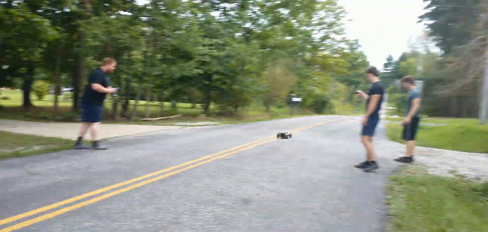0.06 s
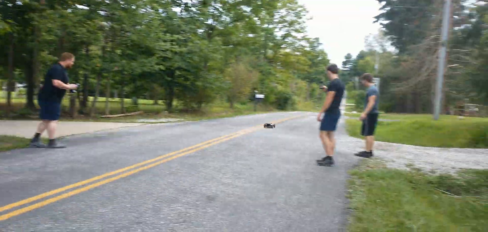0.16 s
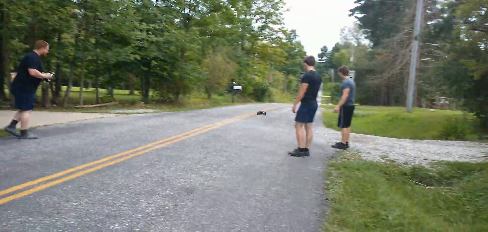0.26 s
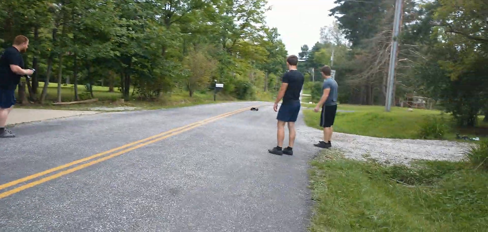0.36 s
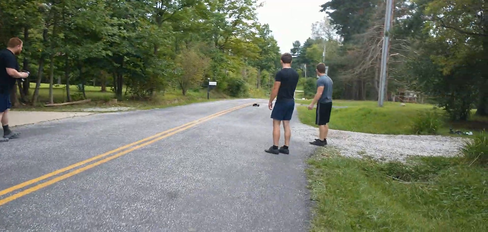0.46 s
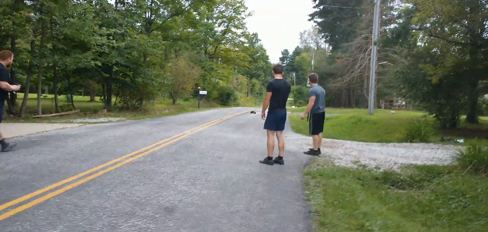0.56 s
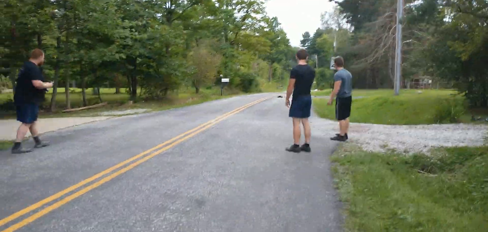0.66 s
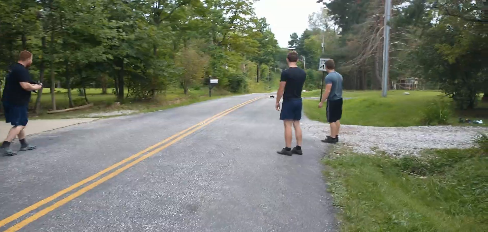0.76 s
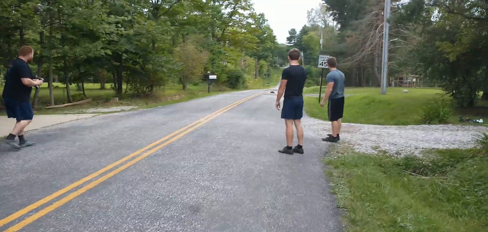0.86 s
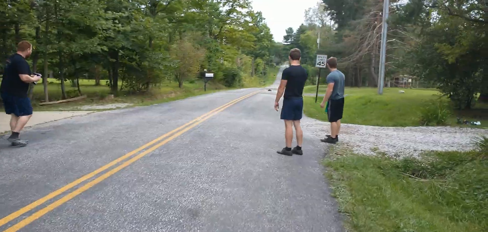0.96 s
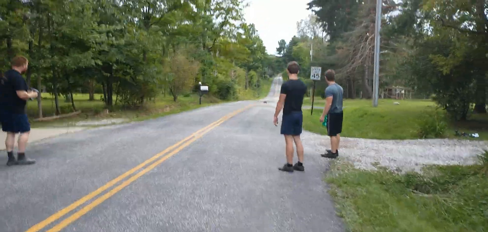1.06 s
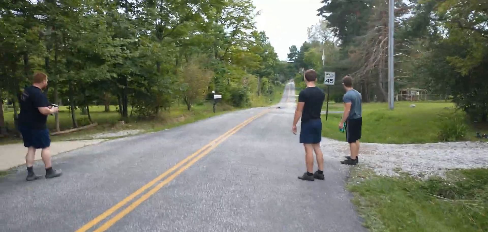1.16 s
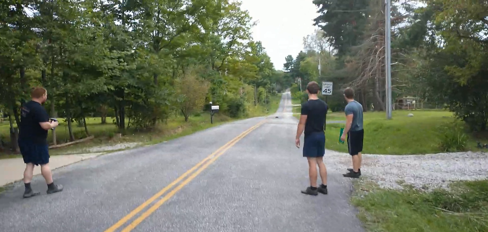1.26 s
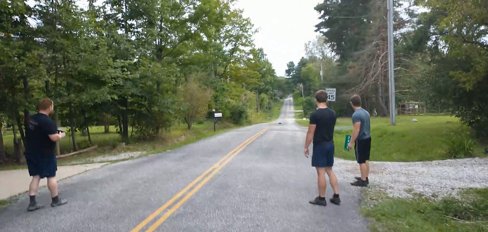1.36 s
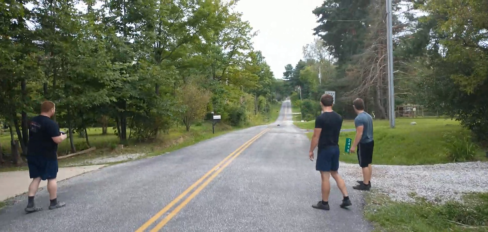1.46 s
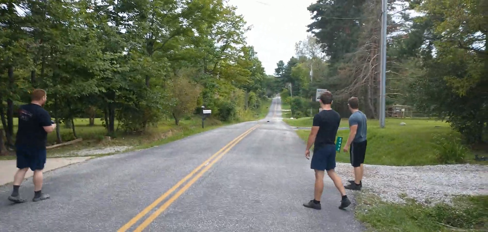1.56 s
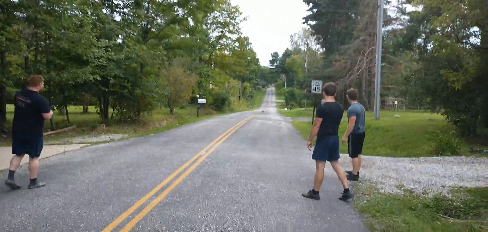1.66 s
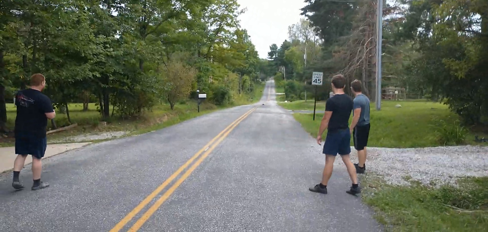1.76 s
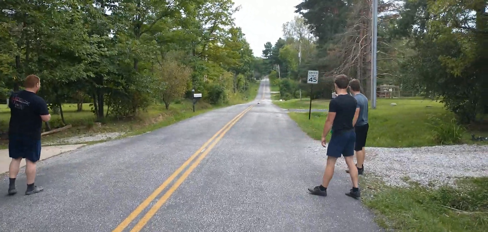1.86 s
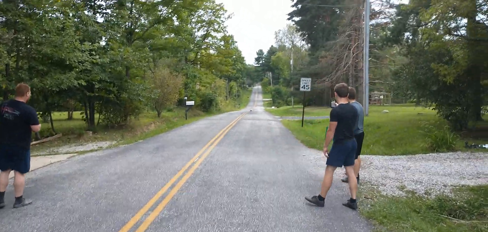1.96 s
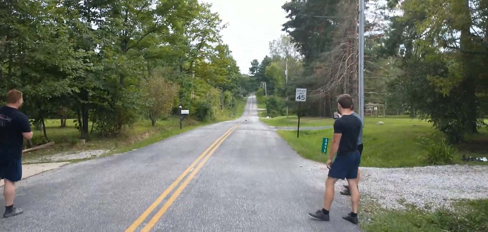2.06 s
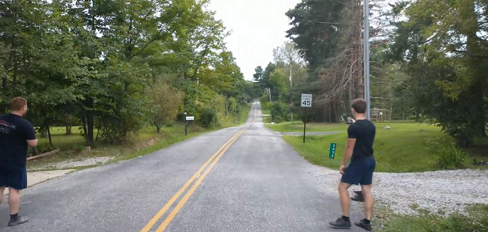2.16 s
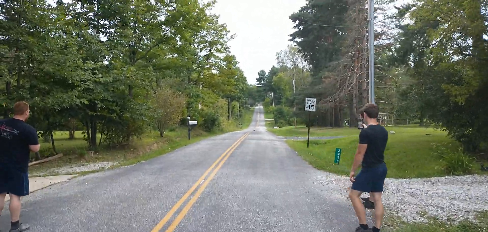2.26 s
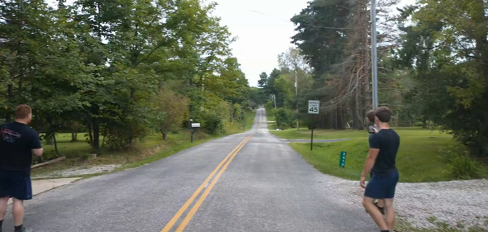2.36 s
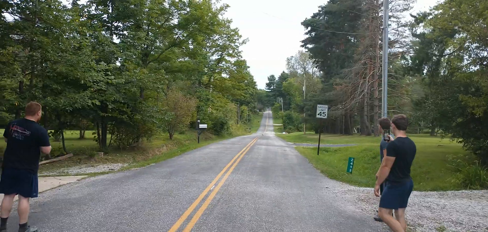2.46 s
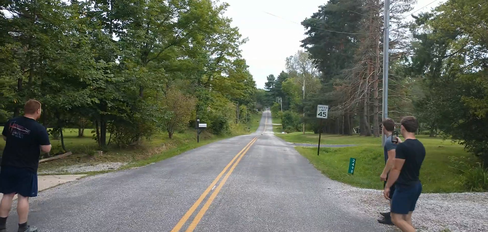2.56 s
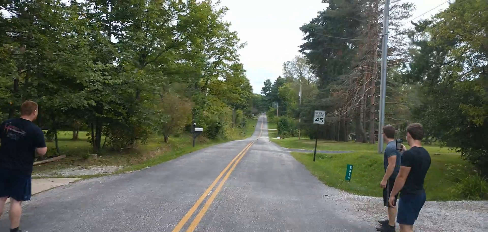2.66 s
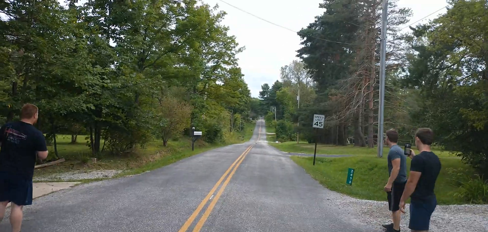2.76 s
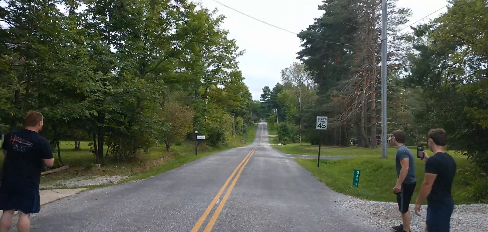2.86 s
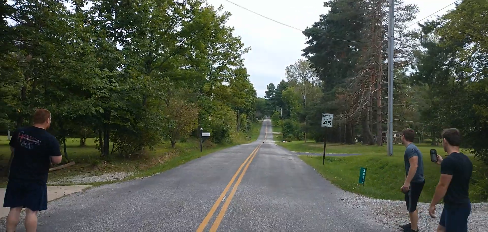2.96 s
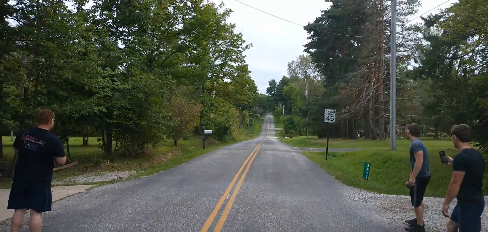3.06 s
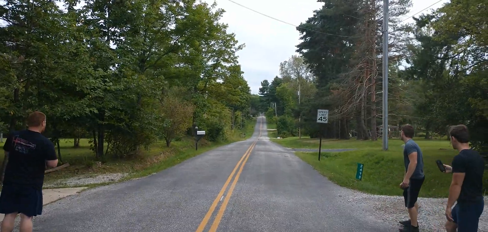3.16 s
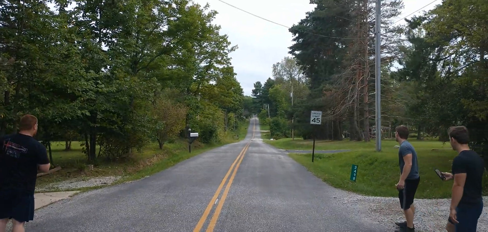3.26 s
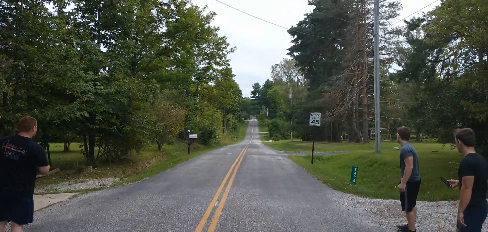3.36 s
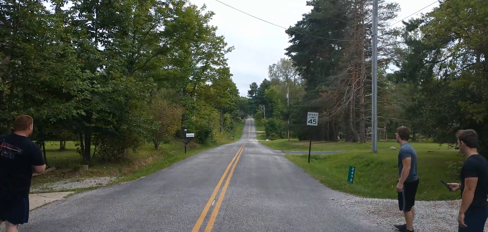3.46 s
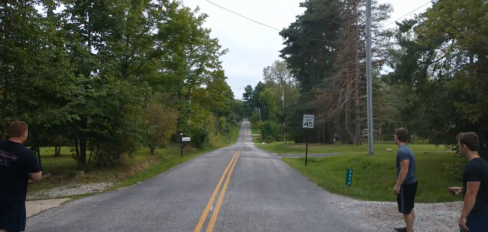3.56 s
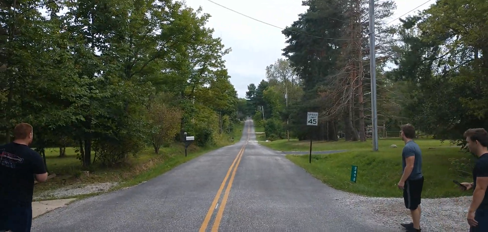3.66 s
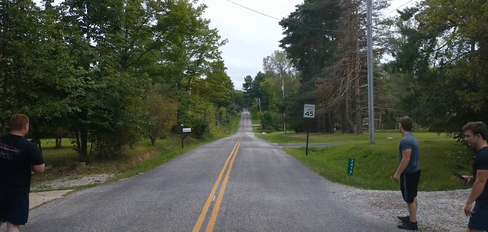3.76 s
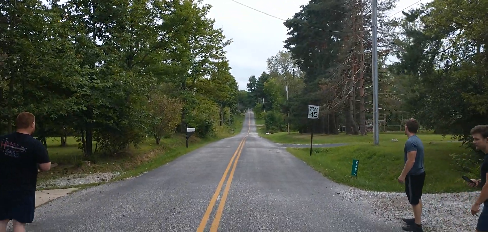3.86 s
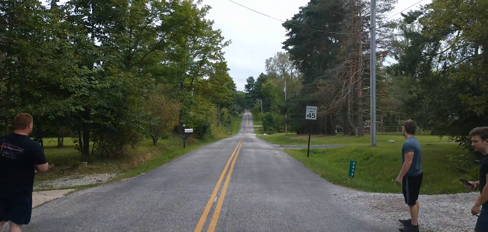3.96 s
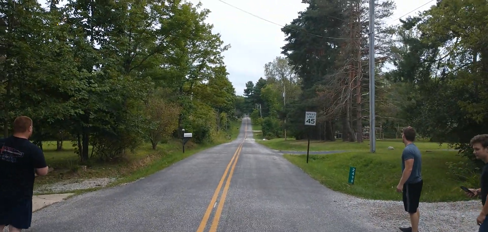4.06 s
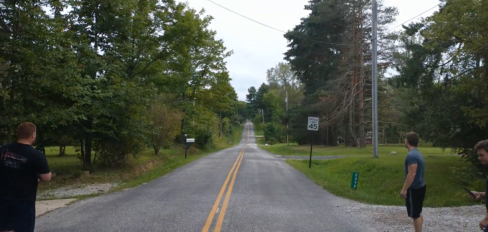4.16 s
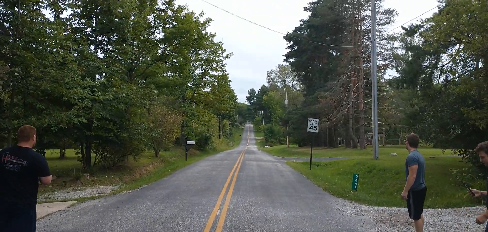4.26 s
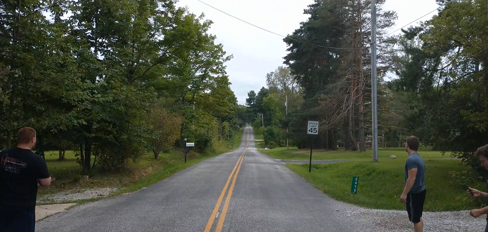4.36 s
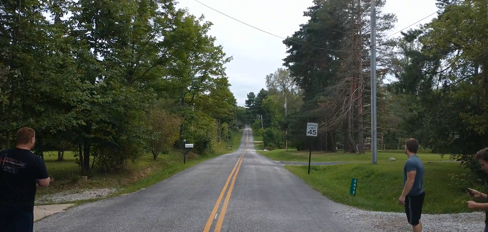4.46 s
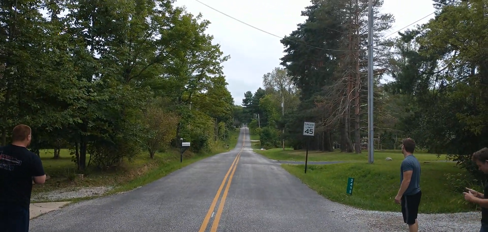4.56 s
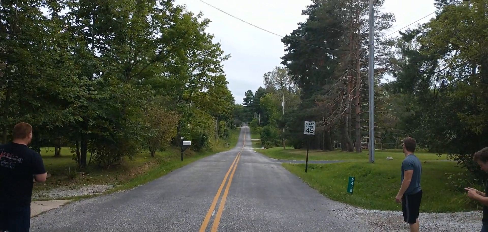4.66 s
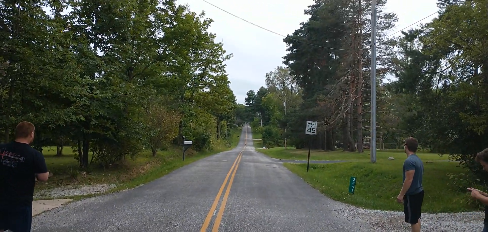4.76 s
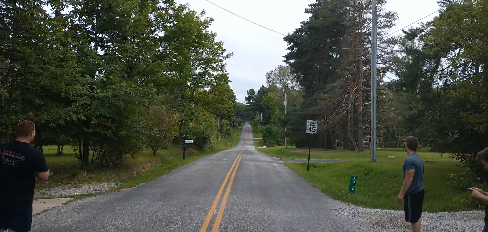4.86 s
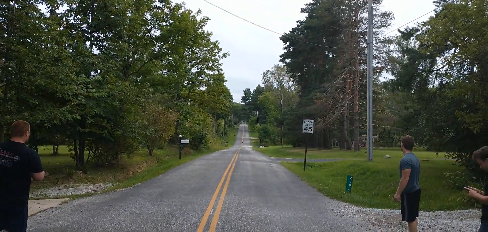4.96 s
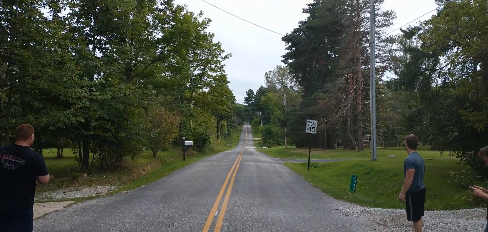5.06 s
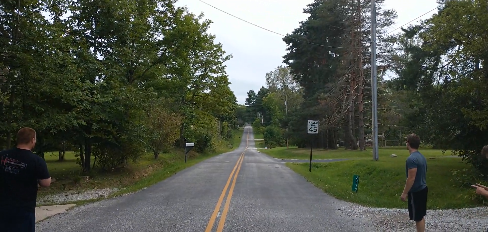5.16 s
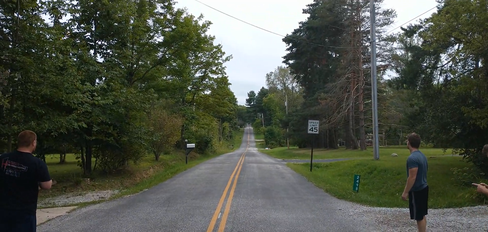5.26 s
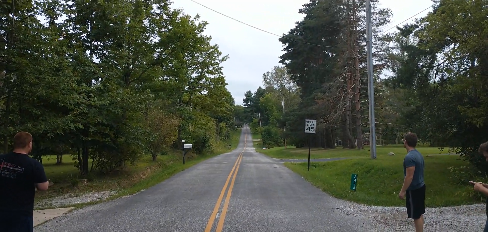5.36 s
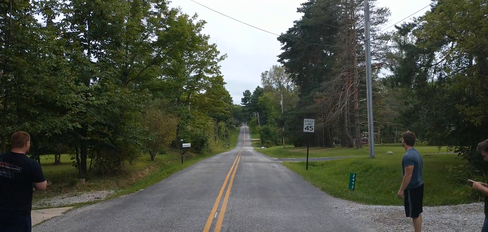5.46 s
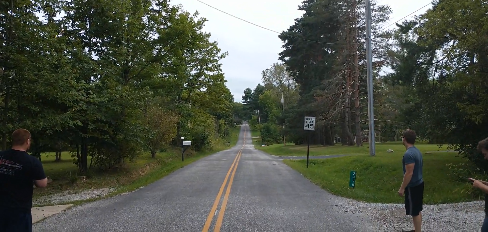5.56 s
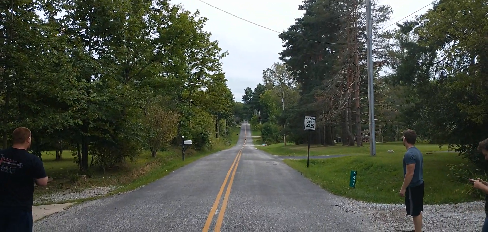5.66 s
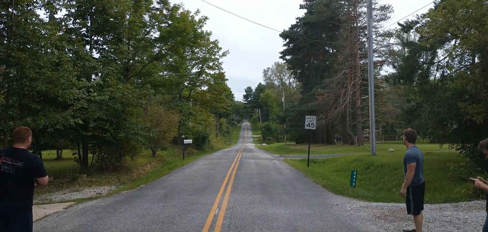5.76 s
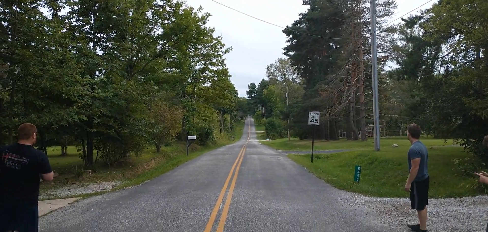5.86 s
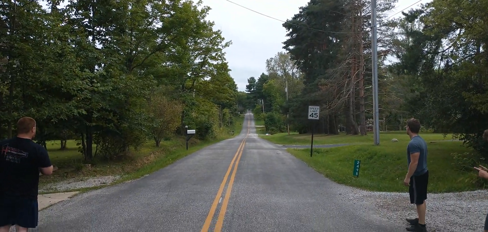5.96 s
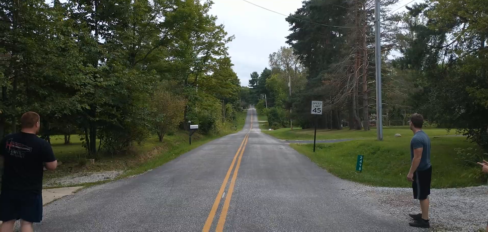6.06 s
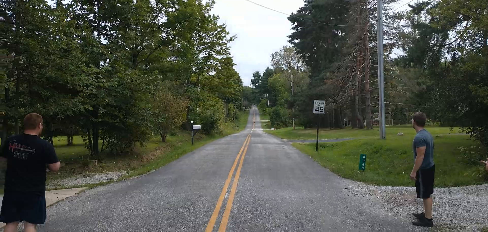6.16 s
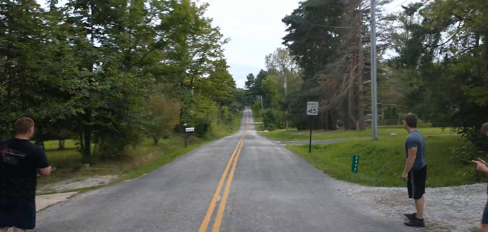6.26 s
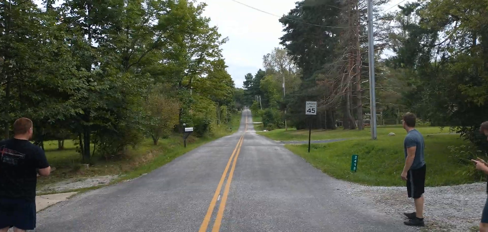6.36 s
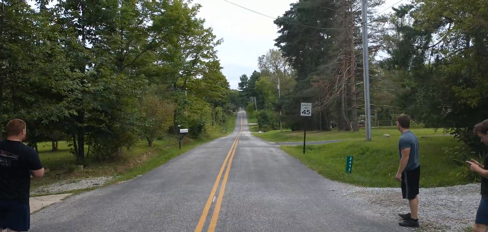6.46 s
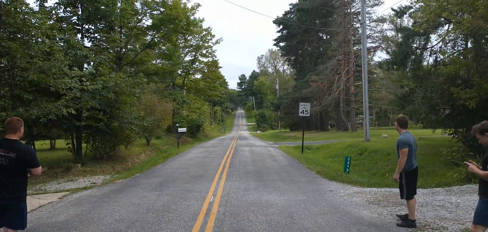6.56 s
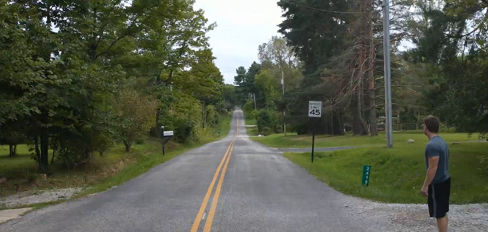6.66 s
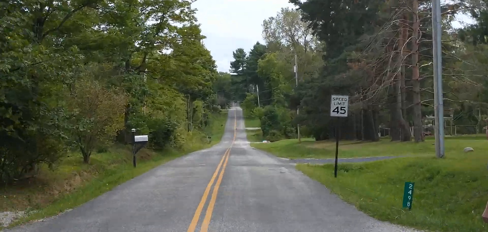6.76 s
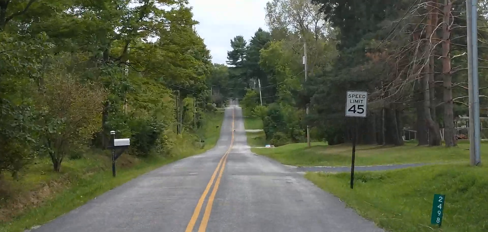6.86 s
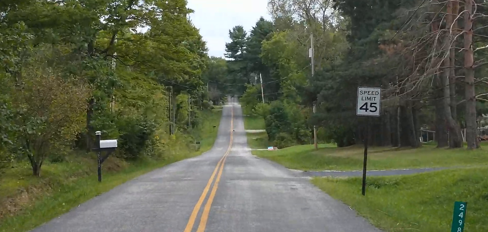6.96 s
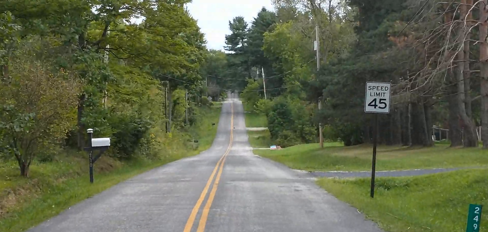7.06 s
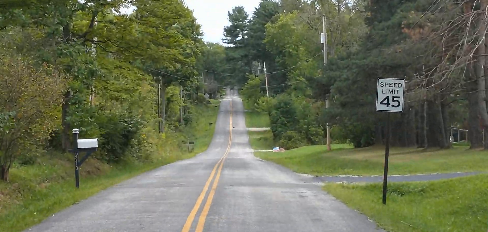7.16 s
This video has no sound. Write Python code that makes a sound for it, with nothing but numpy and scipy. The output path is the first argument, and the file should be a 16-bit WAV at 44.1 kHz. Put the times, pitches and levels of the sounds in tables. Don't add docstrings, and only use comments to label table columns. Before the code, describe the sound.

Open country road, stereo handheld microphone, dry and natural. At 0 s a fast electric model buggy is loud and close: a piercing gear whine near 2.9 kHz, higher harmonics and a rough, hissy tyre roar. It races away, dropping steeply in level within the first second while the pitch stays nearly constant, rising very slightly. Shoes crunch sharply on grit with small thuds around 0.85-1.15 s; duller knocks follow near 1.7 and 2.8 s. The distant roar flutters, brightens around 2 s, then its top hiss falls away at 2.3 s behind a crest. At 3.85 s power cuts, with a small scuff and bumps nearby; the whine almost vanishes. A faint, wavering whine re-emerges from about 4.7 s, gliding down to roughly 1.2 kHz by 7 s as it dies. Soft insects, leaves and low rumble continue underneath. A tiny plastic tick clicks at the right at 6.36 s.

```python
import sys
import numpy as np
from scipy import signal
from scipy.io import wavfile
from scipy.ndimage import uniform_filter1d

SR = 44100
rng = np.random.default_rng(int(sys.argv[2]) if len(sys.argv) > 2 else 0)


def int16_out(signal):
    q = np.round(np.clip(np.atleast_2d(signal).T, -1, 1) * 32767)
    wavfile.write(sys.argv[1], SR, q.astype(np.int16))


def elevation(decibels):
    levels = np.asarray(decibels, float)
    return 10 ** (levels / 20)


N = 318402
HOP = 256
POWER_OFF_S = 3.84

# start_s, speed_turns_per_s
GEAR_SPEED = [(0.0, 66.33), (0.15, 66.39), (0.45, 66.75), (0.85, 67.08), (1.3, 67.26), (1.65, 67.48),
              (2.5, 67.5), (3.0, 67.38), (3.85, 67.32), (4.4, 61.71), (4.8, 57.7), (5.2, 53.6),
              (5.4, 50.51), (5.6, 46.6), (6.0, 40.3), (6.4, 35.4), (6.8, 31.65), (7.22, 28.2)]
# pitch_hz, likeness (0-1), left_lead_rad, tilt_share (of the high L-R tilt)
MICROPHONE_PORTS = [(45, .1, 1, -5.7), (100, 0.98, -0.87, -0.2), (250, 1, 0.72, 0), (527, 0.88, 0, 0.38),
                    (900, 0.9, 0.75, 0.3), (1712, 0.3, 2, 0), (2280, 0.5, 6, 0), (2820, 0, 5.5, 0.65),
                    (4080, 1, 7.5, 0.3), (4500, 0.5, 7.5, 1.54), (6640, 0.3, 8.5, 0.6),
                    (8330, 0.34, 6, 2.5), (15000, 0.34, -2, -0.2)]


def evened(x):
    return x / np.sqrt(np.mean(abs(x) ** 2) + 1e-20)


def read(points, hz):
    f, *values = np.transpose(points)
    return [np.interp(np.log(hz + 1), np.log(f + 1), v) for v in values]


def follow(rows, t):
    s, *values = np.transpose(rows)
    return [np.interp(t, s, v) for v in values]


def add(mix, s, sound):
    part = mix[:, round(s * SR):][:, :sound.shape[1]]
    part += sound[:, :part.shape[1]]


def sides(pan_db):
    return np.array([elevation(pan_db / 2), elevation(-pan_db / 2)])


def flutter(rate_hz, count):
    t = np.arange(0, N, 64)
    z = rng.standard_normal((count, len(t))) + 1j * rng.standard_normal((count, len(t)))
    keep = np.exp(-np.pi * rate_hz * 64 / SR)
    z = signal.lfilter([1], [1, -2 * keep, keep ** 2], np.tile(z, 2))
    return evened(z[:, len(t):])


def frame_grid():
    return np.fft.rfftfreq(1024, 1 / SR), np.arange(N // HOP + 5) * HOP / SR


def smeared(field, frames, bins):
    field = uniform_filter1d(field, size=frames, axis=1 if bins is None else 1)
    return evened(uniform_filter1d(field, size=bins, axis=0))


def noise(db, likeness, patchy_db, flicker_db, streaky_db):
    hz = np.fft.rfftfreq(1024, 1 / SR)
    a, b, c, d, patches, streaks = rng.standard_normal((db.shape[-1], len(hz), 6)).T
    streaks = smeared(streaks, frames=70, bins=3)
    patches = smeared(patches, frames=12, bins=10)
    flicker = rng.standard_normal(db.shape[-1])
    same, lead, _ = read(MICROPHONE_PORTS, hz)
    same = np.clip(same * likeness, 0, 1)[:, None]
    left = a + 1j * b
    right = same * left * np.exp(-1j * lead)[:, None] + np.sqrt(1 - same ** 2) * (c + 1j * d)
    db = db + patchy_db * patches + streaky_db * streaks + flicker_db * flicker
    z = np.array([left, right]) * elevation(db)
    return signal.istft(z, nperseg=1024, noverlap=1024 - HOP)[1][:, :N] / 26


def air():
    # pitch_hz, level_db (per Hz)
    air_colour = [(15, -45.5), (25, -22), (108, 8), (250, -13.5), (719, -17), (1170, -9.5), (1380, -26),
                  (1620, -11), (1910, -18), (3190, -18), (4660, -27), (6630, -3), (8690, -31), (14100, -46),
                  (16200, -38.5)]
    hz, t = frame_grid()
    calm = 1 - np.exp(-np.maximum(t - POWER_OFF_S, 0) / .35)
    rumble_db = (-66 - 0.5 * t) * (1 - calm) - 76.5 * calm
    db = read(air_colour, hz)[0][:, None] + np.outer(np.clip((260 - hz) / 120, 0, 1), rumble_db + 72)
    db = db + 11 * np.exp(-((hz - 13500) / 3000) ** 2)[:, None]
    return elevation(-44.5) * noise(db, likeness=0.95, patchy_db=1.3, flicker_db=1, streaky_db=1.7)


def grit():
    # start_s, level_db, length_ms, centre_hz, pan_db (L-R)
    crunches = [(0.847, -23.5, 7.5, 7150, -2), (0.849, -20, 1.8, 3500, -7), (0.855, -23.5, 6.9, 5530, 0),
                (.884, -32, 1.5, 12000, 1), (.970, -18.5, 1.3, 8000, 5), (1.021, -28, 3.1, 8000, 7),
                (1.119, -19.5, 3, 6760, 4), (2.295, -57, 6, 11000, -11), (2.335, -47, 0.59, 13000, 5.5),
                (3.897, -34.5, 2.6, 900, -2), (3.9, -46, 8, 1400, 2), (5.05, -87.5, 40, 13000, -5),
                (5.38, -72, 50, 13500, 3), (5.77, -78, 40, 13500, -2)]
    out = np.zeros((2, N))
    for s, db, ms, hz, pan_db in crunches:
        t = np.arange(round(ms * 4 * SR / 1000)) / SR * 1000 / ms
        crack_sizes = elevation(4 * rng.standard_normal(9000)[:len(t)])
        cracks = rng.standard_normal((2, 9000))[:, :len(t)] * crack_sizes
        band = signal.butter(2, [.35 * hz, min(1.9 * hz, 16500)], "band", fs=SR)
        crunch = evened(signal.lfilter(*band, cracks)) * np.minimum(t * 4, 1) * np.exp(-t)
        add(out, s, elevation(db) * sides(pan_db)[:, None] * crunch)
    return out


def thuds():
    # start_s, peak_db, pitch_hz, t60_ms
    impacts = [(0.851, -30, 293, 55), (1.081, -31.5, 114, 14), (1.140, -29, 337, 14),
               (1.645, -28, 413, 8.7), (1.7, -43.5, 89, 83), (1.759, -42, 444, 48), (2.825, -38, 318, 11),
               (2.829, -46, 223, 50), (3.880, -42, 706, 8), (3.8927, -30, 480, 6.3), (3.906, -36, 1900, 14),
               (3.911, -35.5, 900, 6.4), (6.307, -57.5, 436, 24), (6.357, -54, 125, 40)]
    out = np.zeros((2, N))
    for s, db, hz, t60_ms in impacts:
        t = np.arange(6000) / SR
        ring = np.sin(2 * np.pi * hz * t) * elevation(-60000 * t / t60_ms) * np.minimum(t * hz * 3, 1) ** 2
        pan_db = -15 if s > 6 else 0
        add(out, s, elevation(db) * sides(pan_db)[:, None] * ring / ring.max())
    return out


def tick():
    t = np.arange(300) / SR
    sweep = np.sin(2 * np.pi * np.cumsum(2900 + 11000 * np.exp(-(t / 0.000525) ** 2)) / SR)
    sweep *= np.minimum(t / .0002, 1) * np.where(t < .0013, .6, np.exp(-(t - .0013) / 0.00031))
    push = -.8 * np.sin(2 * np.pi * 900 * (t - .0004)) * np.exp(-((t - .0009) / .0005) ** 2)
    out = np.zeros((2, N))
    add(out, 6.3612, elevation(-31) * np.array([[.08], [1]]) * (sweep + push))
    return out


def stage(t, close, away, coasting, off_s=.14):
    gone = np.clip(t / 0.81, 0, 1)
    off = np.clip((t - POWER_OFF_S) / off_s, 0, 1)
    return (close + (away - close) * gone) * (1 - off) + coasting * off


def passing(t):
    # start_s, upper_band_db (over the roar)
    tail_beam = [(0.0, -1), (0.12, 3.5), (0.3, 3), (0.7, -1.5), (1.1, 3), (1.6, 8.5), (1.95, 11), (2.23, 9),
                 (2.42, 2.5), (2.9, 3.5), (3.4, -5.5), (3.95, -1.5), (4.45, 7), (5.25, 4), (6.1, 6.5),
                 (6.5, 1.5), (7.0, -12)]
    after = np.maximum(t - POWER_OFF_S, 0)
    off, speed = np.clip(after / 0.05, 0, 1), follow(GEAR_SPEED, t)[0]
    eased = 1 - np.exp(-after / .5)

    level = -24 - 20 * np.log10(1 + t / 0.23)
    level += -4 * off - 12.5 * (1 - np.exp(-after / 0.57))
    level += 17 * np.log10(speed / speed[0])

    low = (-9 - 2.5 * t) * (1 - eased) - 11.5 * eased

    screen_s, screen_edge_s, air_db_per_s = 2.31, 0.031, -10
    top = -4 - 13.5 / (1 + np.exp((screen_s - t) / screen_edge_s))
    top += air_db_per_s * np.maximum(t - screen_s, 0)
    top += 5 * np.exp(-((t - 1.21) / 0.069) ** 2)
    top = top * (1 - eased) - 11 * eased

    pan_low = stage(t, close=-1.5, away=-2.8, coasting=-3.5)
    pan_high = stage(t, close=4.5, away=7, coasting=6.5)
    return level, low, follow(tail_beam, t)[0], top, pan_low, pan_high


def roar():
    band_centres = [280, 1100, 3600, 7000]
    # pitch_hz, level_db (per Hz)
    roar_colour = [(53, -57), (90, -31.5), (331, -11), (469, -14), (1030, -5.5), (1420, -6), (2190, -7),
                   (2850, -4.5), (3110, -6.5), (5010, -10.5), (5710, -9), (10000, -25), (13600, -28),
                   (15200, -17.5), (16200, -53)]
    # centre_hz, width_hz, close_db, away_db,
    # coasting_db
    shell_modes = [(651.6, 136, 2.5, 8.5, 14), (1139, 212, 7.5, 5, 7), (1567, 340, -3.5, 6.5, 14),
                   (2010, 120, 3, 5, 5.5), (2284, 150, 5.5, -7.5, -22), (1398, 110, -2.5, -8.5, -14),
                   (2628, 110, -4, -1.5, 5.5), (2810, 350, 7.5, 1, 2), (3315, 220, -0.5, 2.5, 15.5),
                   (3956, 330, -0.5, 5.5, 10.5), (5060, 1300, 0, -2, 0.5), (5830, 830, 7, 4, -2),
                   (8940, 310, 1.5, 3, -16.5), (13300, 5100, -0.5, -1.5, -13), (15300, 1300, -6, -7.5, -17)]
    crest_changes = [2.5, -1, -2, -0.5, 9, 9.5, 5, -1, -5, -3, -1.5, -2, 0, 9, 6]
    ring_in_s = 0.96
    hz, t = frame_grid()
    level, low, upper, top, pan_low, pan_high = passing(t)
    change = np.array([low + 14, 0 * low, upper + 0.89, top + 9])
    share = np.array(read(np.c_[band_centres, np.eye(len(band_centres))], hz)).T
    db = read(roar_colour, hz)[0][:, None] + share @ change + level + 17.5
    db = db - np.outer((hz / 10000) ** 2, 7 * np.clip(t - 1.73, 0, 1))
    hidden = np.clip((t - 2.07) / 0.54, 0, 1) * stage(t, 1, 1, 0, ring_in_s)
    for (centre_hz, width_hz, *stages_db), crest_db in zip(shell_modes, crest_changes):
        mode = np.exp(-((hz - centre_hz) / width_hz) ** 2 * 2)
        db = db + np.outer(mode, stage(t, *stages_db, ring_in_s) + crest_db * hidden)
    tilt = read(MICROPHONE_PORTS, hz)[2][:, None]
    pan = pan_low * np.clip(hz / 600, 0, 1)[:, None] * (1 - np.clip(tilt, 0, 1)) + pan_high * tilt
    return noise(db + np.array([pan, -pan]) / 2, likeness=1.0, patchy_db=1.13, flicker_db=1.0, streaky_db=0.44)


def line(turns, hz, db, pan_db, blur):
    steady = .95 + .3 * flutter(3, count=2)
    blurred = flutter(7, count=1) * flutter(40, count=2)
    paths = np.sqrt(1 - blur) * steady + np.sqrt(blur) * blurred
    lead = read(MICROPHONE_PORTS, hz)[1]
    t = np.arange(len(hz)) * 64 / SR
    lead = lead - hz / 2900 * (1.1 * np.exp(-t / .6) + 1.6 * np.exp(-t / .06))
    paths[1] = (.65 * paths[0] + .35 * paths[1]) * np.exp(-1j * lead)
    paths = np.sqrt(2) * elevation(db) * sides(pan_db) * paths
    carrier = np.exp(2j * np.pi * (turns + rng.random()))
    return np.array([(np.interp(np.arange(N) / 64, np.arange(len(v)), v) * carrier).real for v in paths])


def rotation():
    every = np.arange(N) / SR
    speed = uniform_filter1d(follow(GEAR_SPEED, every)[0], size=4000)
    t = every[::64]
    coasting = np.clip((t - POWER_OFF_S) / .1, 0, 1)
    blur = .05 + .55 * coasting
    return np.cumsum(speed) / SR, speed[::64], t, coasting, blur


def lingering_top(t):
    return passing(np.maximum(t - 0.16, 0))[3]


def switching():
    # start_hz, later_hz, width_hz
    whistles = [(13470, 13290, 90), (15050, 15040, 70)]
    # level_db (over the top band), change_db_per_s
    whistle_levels = [(-12.5, -4.5), (-14.5, -3)]
    every = np.arange(N) / SR
    _, _, t, coasting, _ = rotation()
    level, _, _, top, _, pan_high = passing(t)
    out = np.zeros((2, N))
    for (start_hz, later_hz, width_hz), (db, db_per_s) in zip(whistles, whistle_levels):
        hz = later_hz + (start_hz - later_hz) * np.exp(-every / .25)
        wobble = np.cumsum(rng.standard_normal(N)) * np.sqrt(width_hz / (2 * np.pi * SR))
        db = level + top + db + 5.5 + db_per_s * t - 40 * coasting
        out += line(np.cumsum(hz) / SR + wobble, hz[::64], db, 0.27 * pan_high, blur=0.75)
    return out


def drive_shafts():
    shaft_orders = [10.31, 11.31, 15, 20.7, 26.3, 30, 39.69, 46.31, 49.62, 50.62]
    # close_db, away_db, coasting_db
    shaft_levels = [(-9, -30, -53), (-11.5, -23, -49), (-17, -19, -30), (-12.5, -44, -11),
                    (-14, -13.5, -46), (-11.5, -13, -20), (-7, -20.5, -52), (-31.5, -21.5, -26.5),
                    (-21.5, -11.5, -35.5), (-30.5, -24.5, -29.5)]
    turns, speed, t, _, blur = rotation()
    level, _, upper, _, pan_low, _ = passing(t)
    beamed = upper + .3 * lingering_top(t)
    out = np.zeros((2, N))
    for k, stages_db in zip(shaft_orders, shaft_levels):
        db = level + (beamed if k > 45 else 0) + stage(t, *stages_db)
        out += line(k * turns, k * speed, db, pan_low, blur)
    return out


def gear_teeth():
    # start_s, tooth_db, neighbours_db (once-a-turn sidebands)
    whine_levels = [(0.03, -26.5, -32), (0.13, -24, -38), (0.27, -33.5, -40.5), (0.48, -31, -40),
                    (0.68, -41.5, -48), (0.9, -46.5, -45), (1.55, -40, -43.5), (2.3, -45, -44.5),
                    (2.6, -50.5, -56), (3.05, -50.5, -56.5), (3.4, -62.5, -63), (3.9, -62, -67),
                    (4.05, -86, -86), (4.6, -86, -84), (4.75, -69.5, -78), (5.38, -67.5, -57),
                    (5.6, -59.5, -59.5), (6.25, -61.5, -59.5)]
    # multiple (of the gear speed), tone (tooth 0, neighbour 1, second 2, third 3), driven_db, coasting_db
    tooth_lines = [(43, 0, 0, 0), (41, 1, -6, -14), (42, 1, -1, -5), (44, 1, -6, -3), (45, 1, -13, -14),
                   (83, 2, -16, -16), (84, 2, -5, -20), (85, 2, -2, -10), (86, 2, -16, -2), (87, 2, -4, -6),
                   (88, 2, -11, -12), (129, 3, -18, -4), (130, 3, -20, -4)]
    # pitch_hz, level_db, pan_db (L-R)
    housing_path = [(1400, -17, 7), (1450, 0, 8), (1550, 1.5, 3.5), (1900, 6, -12), (2610, -7.5, 3.5),
                    (2740, 1, -2.5), (4280, 1.5, -1), (5400, 0.5, 8.5)]
    # centre_hz,
    # width_hz, lost_db
    ground_dips = [(1740, 60, 7), (2160, 180, 18), (2970, 110, 9), (3680, 130, 5), (4680, 200, 7),
                   (5880, 330, 14), (7900, 1500, 24)]
    turns, speed, t, coasting, blur = rotation()
    driven = 1 - coasting
    level, _, upper, _, _, pan_high = passing(t)
    ending = np.maximum(t - whine_levels[-1][0], 0)
    ending_db = -7 * np.minimum(ending / 0.15, 1) - 9.5 * ending
    tooth, neighbours = follow(whine_levels, t) + ending_db
    bright = (level + lingering_top(t)) * driven + tooth * coasting
    second = bright + 1.38 * upper * driven + stage(t, close=-6, away=-10, coasting=0.5)
    third = bright + stage(t, close=-25.5, away=-10.5, coasting=-7)
    tones = [tooth, neighbours, second, third]
    out = np.zeros((2, N))
    for k, tone, driven_db, coasting_db in tooth_lines:
        hz = k * speed
        housing_db, tilt_db = read(housing_path, hz)
        db = tones[tone] + driven_db + (coasting_db - driven_db + housing_db) * coasting
        db += 5 * (tone < 2) * np.exp(-t / 0.19)
        for dip_hz, width_hz, lost_db in ground_dips:
            db -= lost_db * np.exp(-((hz - dip_hz) / width_hz) ** 2) * coasting
        driven_pan_db = 1.4 * pan_high if k > 50 else stage(t, -1, 2, 2)
        out += line(k * turns, hz, db, driven_pan_db * driven + tilt_db * coasting, blur)
    return out


def scene():
    surroundings = air() + grit() + thuds() + tick()
    buggy = roar() + switching() + drive_shafts() + gear_teeth()
    return surroundings + buggy


def top_cut(x):
    return signal.sosfilt(signal.butter(12, 16590, fs=SR, output="sos"), x)


def record(dry):
    dry = signal.sosfilt(signal.butter(2, 55, "high", fs=SR, output="sos"), dry)
    dry = signal.oaconvolve(dry, signal.firwin(255, 15550, fs=SR)[None], "same")
    return top_cut(dry)


dry = scene()
out = record(dry)
int16_out(out)
```